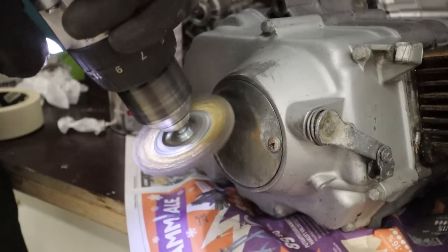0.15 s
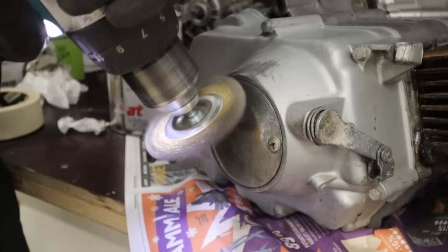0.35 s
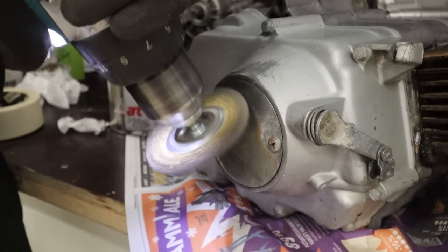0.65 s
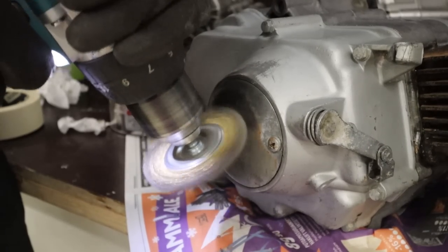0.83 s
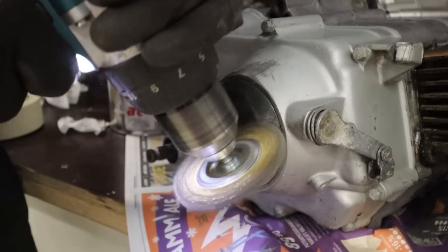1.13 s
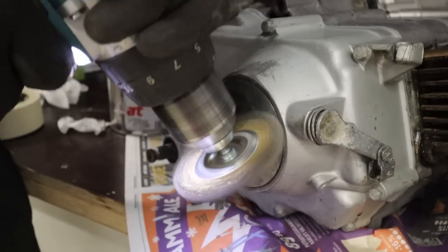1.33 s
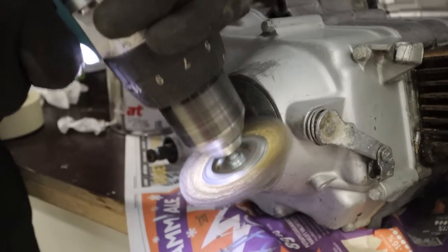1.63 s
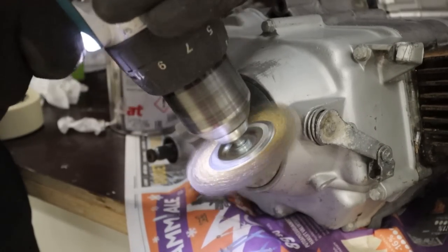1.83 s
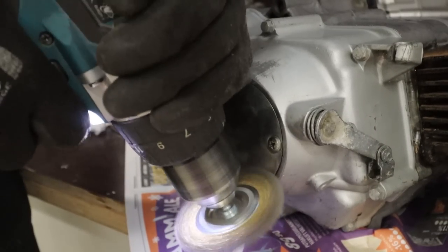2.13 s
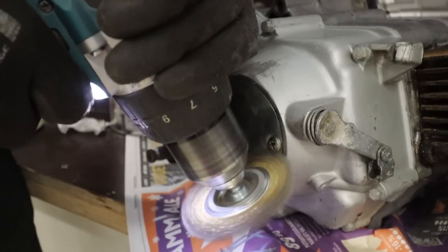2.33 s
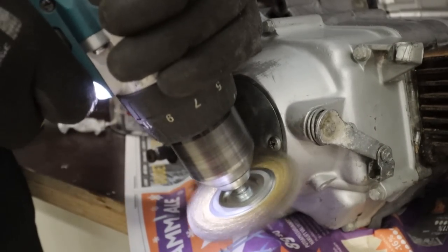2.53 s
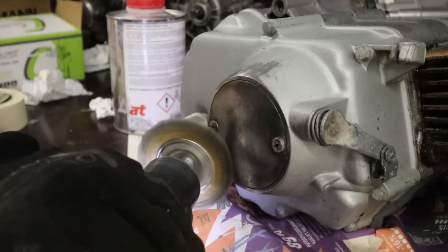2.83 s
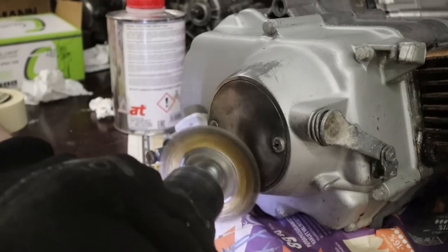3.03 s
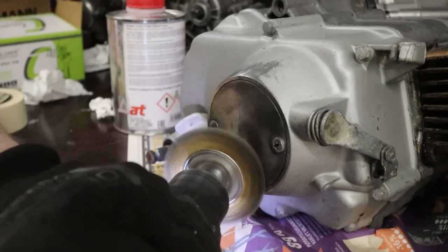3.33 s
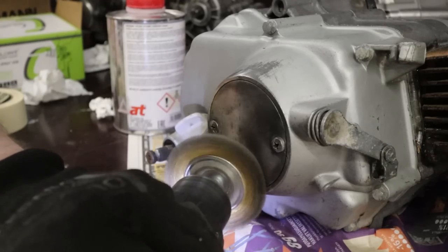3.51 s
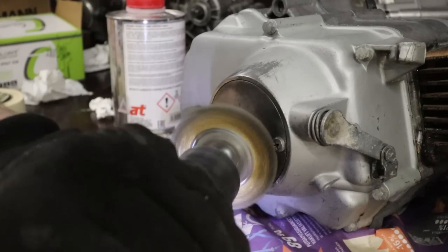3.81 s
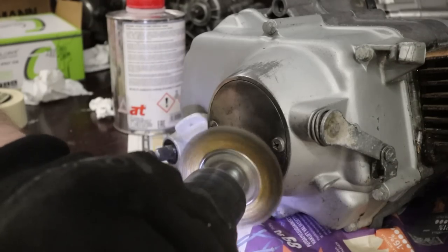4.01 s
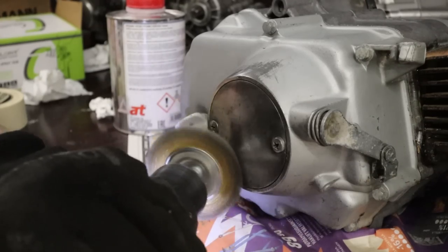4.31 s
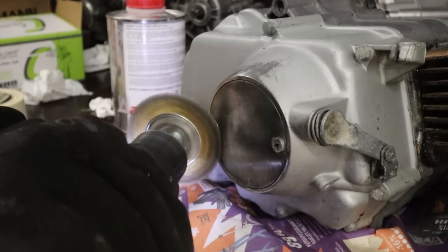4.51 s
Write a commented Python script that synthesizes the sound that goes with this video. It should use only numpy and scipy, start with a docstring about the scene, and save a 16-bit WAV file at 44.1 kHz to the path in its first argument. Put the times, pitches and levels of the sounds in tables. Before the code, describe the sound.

Close, dry workshop sound, the same in both channels: steady electric motor whine and rough metallic bristle hiss from the first instant to the last. Soft low gusts of air thump irregularly in the first half. Around the middle the drill blends into a second angle, more ringing and less windy. Later come rapid rasping chirps, faint dull knocks and a sharp wire click near the end.

```python
"""Drill with a wire brush on metal

A cordless drill spins a steel wire brush against a cast metal cover, close to a single microphone.
The motor whines in tones tied to its shaft speed; the bristles, made of shaped noise, scratch and ring the cover.
Short noise bursts make single wires snap, a long tuft scrape and the brush knock.
Midway one shot of the drill crossfades into a second, from another position: the colour shifts and
the cooling air buffets the microphone far less."""
import sys
import numpy as np
from scipy import signal
from scipy.fft import rfft, irfft
from scipy.io import wavfile
from scipy.ndimage import uniform_filter1d

SR = 44100
rng = np.random.default_rng(int(sys.argv[2]) if len(sys.argv) > 2 else 0)


def gain_from_decibels(decibels):
    """Convert decibel values to linear amplitude factors."""
    exponent = np.asarray(decibels, float) / 20
    return 10 ** exponent


def to_wav(s):
    """Save 16-bit WAV."""
    ch = np.atleast_2d(s).T  # columns
    pcm = np.round(np.clip(ch, -1, 1) * 32767)  # PCM
    wavfile.write(sys.argv[1], SR, pcm.astype(np.int16))


N = 205709  # length in samples
T = np.arange(N) / SR  # time of each sample, s
HZ = np.fft.rfftfreq(N, 1 / SR)  # pitch of each spectrum bin


def rms1(x):
    """Scale to unit rms."""
    return x / np.sqrt(np.mean(x ** 2))


def curves(table):
    """Draw straight lines through each column of a table, one value per sample."""
    time_s, *columns = np.transpose(table)
    return [np.interp(T, time_s, column) for column in columns]


def shape_db(points):
    """Read a (pitch_hz, level_db) list on a log-frequency axis, one level per spectrum bin."""
    hz, db = np.transpose(points)
    return np.interp(np.log(HZ + 1), np.log(hz), db)


def band(spectrum, lo_hz, hi_hz):
    """The part of a spectrum between two soft edges, as sound."""
    def below(edge_hz):
        return 1 / (1 + (HZ / edge_hz) ** 24)
    return irfft(spectrum * np.sqrt(below(hi_hz) * (1 - below(lo_hz))), N)


def walk(rate_hz):
    """Random levels renewed rate_hz times a second and smoothed twice, with an rms near 1."""
    hold = int(SR / rate_hz)
    steps = np.repeat(rng.standard_normal(N // hold + 1), hold)
    smooth = uniform_filter1d(uniform_filter1d(steps, hold), hold)
    return rms1(smooth[:N])


# motor speed, sagging under load: start_s, shaft_hz
SHAFT_SPEED = [(0, 407), (.15, 407.4), (.22, 401.5), (.46, 399.5), (.53, 395.1), (.63, 399.3), (.91, 400),
               (1.05, 397.1), (1.1, 401), (1.26, 401.3), (1.35, 395), (1.39, 399.7), (1.6, 397.7),
               (1.66, 398.8), (1.73, 395.4), (1.84, 395.8), (1.89, 399.1), (1.97, 394.6), (2.14, 401),
               (2.35, 401.4), (2.41, 398), (2.57, 399), (2.65, 394.7), (2.87, 399.8), (3.02, 395),
               (3.2, 400.4), (3.38, 398.3), (3.6, 398.3), (3.83, 391.7), (3.94, 400), (4.04, 402.5),
               (4.2, 395), (4.34, 400.5), (4.41, 400.8), (4.55, 393.7), (4.66, 396.5)]


def shaft():
    """Motor speed, and the turns it adds up to as snagging wires tug the speed a little at random."""
    shaft_hz = curves(SHAFT_SPEED)[0]
    turns = np.cumsum(shaft_hz * (1 + 0.0005 * walk(40))) / SR
    return turns, shaft_hz


def crossfade():
    """Share of the second shot: 0 in the first shot, 1 in the second, a straight ramp between."""
    return np.interp(T, (2.37, 3.05), (0, 1))


def tone(turns, order, db, rough, wobble_hz):
    """A sine at a multiple (order) of the shaft speed; roughness shakes its size and phase."""
    shake = 1 + rough * (walk(wobble_hz) + 1j * walk(wobble_hz))
    wave = np.real(shake * np.exp(2j * np.pi * order * turns))
    return np.sqrt(2) * gain_from_decibels(db) * wave / np.sqrt(1 + 2 * rough ** 2)


MAIN_ORDERS = (1, 20, 23)  # pitches as multiples of the shaft speed
# motor tones, one row per main order: first_shot_db, second_shot_db, roughness (0-1), slow_waver_db
MAIN_TONES = [(-38, -39.5, 0.13, 0.64), (-40, -42, .2, 2), (-31.5, -41, 0.3, 3)]
# commutator whine and its octaves, as the vents turn to and from the microphone:
# start_s, order_4_db, order_8_db, order_16_db
COMMUTATOR_WHINE = [(0, -28, -32, -30), (.25, -25.5, -32, -33), (.5, -27.5, -37, -31),
                    (1.1, -26.5, -38, -35), (1.6, -25, -33, -33), (2.3, -26.5, -46, -35),
                    (2.7, -27.5, -36, -39), (2.95, -35.5, -29, -30), (3.25, -31.5, -33, -31),
                    (3.5, -32.5, -32.5, -37), (3.75, -34, -33, -30), (4.0, -44, -30, -31),
                    (4.25, -41, -34, -30), (4.5, -37, -29, -29), (4.66, -44, -31, -34)]
# weaker gear and spindle tones, levels before the load changes them:
# order (multiple of shaft speed), first_shot_db, second_shot_db, roughness (0-1)
GEAR_TONES = [(.244, -57.5, -57, 0.44), (.57, -68, -58.5, 1), (5., -62, -41, 0.3), (6., -68, -52, 0.17),
              (10.19, -60, -36, 1)]


def motor(turns, shaft_hz, second_share):
    """Main, commutator and gear tones all follow the shaft; the gears growl louder as it sags."""
    main = 0
    for order, (first_db, second_db, rough, waver_db) in zip(MAIN_ORDERS, MAIN_TONES):
        level_db = first_db + second_share * (second_db - first_db) + waver_db * walk(4.06)
        main = main + tone(turns, order, level_db, rough, 60)
    whine = 0
    for order, level_db in zip((4, 8, 16), curves(COMMUTATOR_WHINE)):
        whine = whine + tone(turns, order, level_db, 0.12, 60)
    gears = 0
    for order, first_db, second_db, rough in GEAR_TONES:
        gears = gears + tone(turns, order, first_db + second_share * (second_db - first_db), rough, 30)
    usual_hz, load_db_per_hz = 398.3, 1.1
    load_db = np.clip(load_db_per_hz * (usual_hz - shaft_hz), -6, 4)
    # main tones and whine dip briefly where the two shots cross and partly cancel
    dip_s, dip_width_s, dip_db = 2.81, 0.03, -9
    dip = gain_from_decibels(dip_db * np.exp(-((T - dip_s) / dip_width_s) ** 2))
    return (main + whine) * dip + gears * gain_from_decibels(load_db)


# resonances and hollows of cover and bench: pitch_hz, width_hz, first_shot_db, second_shot_db
COVER_RESONANCES = [(830, 50, 7, 0), (940, 100, 0, 3), (1370, 120, -3, -3), (2080, 200, -2, 0),
                    (2400, 100, 2, 1), (3030, 120, -3, -2), (3120, 50, 6, 0), (3580, 80, 0, 2),
                    (3760, 160, 0, 4.5), (4070, 80, 0, 2), (5800, 400, 2, 1), (6650, 500, -4, -4),
                    (7130, 250, 0, 4), (8050, 300, 2, 0), (10700, 700, 0, -2), (11300, 400, 0, 2),
                    (14250, 350, 2, 2.5)]


def coloured(x, column, points):
    """Spectrum of x through one shot's colour and the cover's resonances."""
    db = shape_db(points)
    for row in COVER_RESONANCES:
        db = db + row[column] / (1 + (2 * (HZ - row[0]) / row[1]) ** 2)
    return rfft(x) * gain_from_decibels(db)


# colour of rush and scratch in the first shot; each band is levelled later: pitch_hz, relative_db
FIRST_COLOUR = [(100, -24), (200, -27), (350, -19), (700, -12), (1000, -8), (1700, -6), (2100, -8),
                (3200, -5), (5500, -3), (6300, -6), (9000, -6), (10200, -13), (13500, -14.5), (14700, -17),
                (15700, -18.5)]
# the same in the second shot: pitch_hz, relative_db
SECOND_COLOUR = [(100, -30), (200, -28), (350, -19), (700, -12), (1000, -7), (1700, -6), (2900, -6),
                 (3700, -2), (5200, -7), (6300, -8), (9000, -6), (10200, -15), (12000, -13.5),
                 (13800, -16.5), (14900, -20.5), (15700, -21)]
# how hard the wires bear on the cover; each layer follows it by its own share: start_s, pressure_db
WIRE_PRESSURE = [(0, -1), (.28, 0.5), (.6, 0.3), (1.26, 0.8), (1.6, 0.2), (1.85, 0.8), (2.24, -.8),
                 (2.6, 0.5), (3.05, -0.5), (3.22, 0.5), (3.5, -.2), (3.8, 2), (3.98, -0.8), (4.2, 1.4),
                 (4.34, -2), (4.48, 1), (4.66, -2)]


def brush(turns, second_share):
    """Dense wire ticks of uneven size over air rush; the ring and scratch throb with the spindle."""
    size_db = np.minimum(2.75 * rng.exponential(size=N), 11)
    ticks = rms1(rng.standard_normal(N) * gain_from_decibels(size_db))
    noise = 0.65 * ticks + 0.76 * rng.standard_normal(N)
    first = coloured(noise, 2, FIRST_COLOUR)
    second = coloured(noise, 3, SECOND_COLOUR)
    pressure_db = curves(WIRE_PRESSURE)[0]

    def part(lo_hz, hi_hz):
        fading_out = (1 - second_share) * rms1(band(first, lo_hz, hi_hz))
        return fading_out + second_share * rms1(band(second, lo_hz, hi_hz))

    def layer_db(first_db, second_db, db_per_pressure_db):
        return first_db + second_share * (second_db - first_db) + db_per_pressure_db * pressure_db

    tuft_pass_s = 3.874  # a moment when the long tuft meets the cover
    shaft_turns_per_spindle_turn = 12.36
    turns_from_pass = turns - np.interp(tuft_pass_s, T, turns)
    throb = np.cos(2 * np.pi * turns_from_pass / shaft_turns_per_spindle_turn)
    chatter = walk(39.9)  # quick uneven flicker shared by the layers from fan to top

    rush_db = layer_db(-28.5, -29, 0.32)
    low = part(133, 405) * gain_from_decibels(rush_db - 18.5) + part(414, 1465) * gain_from_decibels(rush_db)
    fan = part(1625, 2920) * gain_from_decibels(-25 + 0.5 * second_share + 0.32 * chatter)
    ring = part(3110, 4180) * gain_from_decibels(layer_db(-26.5, -23.3, 0.71) + 0.47 * chatter + 0.35 * throb)
    scratch = part(4450, 5940) * gain_from_decibels(layer_db(-23, -25.5, 0.99) + 0.47 * chatter + 0.32 * throb)
    edge = part(6260, 7470) * gain_from_decibels(layer_db(-28.5, -27.5, 0.1) + 0.46 * chatter + 0.5 * throb)
    bright_db = layer_db(-26.5, -29, 1.2) + 0.45 * chatter + 0.74 * second_share * throb
    bright = part(8100, 9800) * gain_from_decibels(bright_db)
    top = part(10170, 19600) * gain_from_decibels(layer_db(-27, -27.5, 0.3) + 0.42 * chatter + 0.5 * throb)
    return low + fan + ring + scratch + edge + bright + top


# colour of the air's rumble, before it is scaled to unit rms: pitch_hz, relative_db
AIR_COLOUR = [(15, -4), (30, 0), (60, -1), (100, -7), (150, -14), (200, -20)]
# gusts of cooling air on the microphone, added to a steady floor: peak_s, level_db
AIR_GUSTS = [(.2, -44), (.6, -46), (.74, -48), (1.06, -45), (1.32, -36), (1.45, -47), (1.6, -41),
             (1.8, -40), (1.93, -40), (2.06, -39), (2.25, -52), (2.5, -49), (2.68, -52), (2.8, -54),
             (3.87, -58)]


def buffet():
    """Cooling air flaps on the microphone: low noise swelling in uneven gusts."""
    noise = rng.standard_normal(N) * gain_from_decibels(2 * walk(16))
    low = band(rfft(noise) * gain_from_decibels(shape_db(AIR_COLOUR)), 16, 230)
    rise_s, fall_s = 0.068, 0.07
    swell = 0
    for peak_s, db in AIR_GUSTS:
        swell = swell + gain_from_decibels(db) * np.exp(np.minimum((T - peak_s) / rise_s, (peak_s - T) / fall_s))
    floor_db = np.interp(T, (2.75, 2.95), (-53, -70))  # calmer air as the second shot fades in
    return rms1(low) * (gain_from_decibels(floor_db) + swell)


def bursts(rows, rise_s, fall_s, width, boost_db):
    """Short noise bursts ringing around a pitch: rows of peak_s, level_db, pitch_hz."""
    out = np.zeros(N)
    t = np.arange(int(0.08 * SR)) / SR
    env = (1 - np.exp(-t / rise_s)) * np.exp(-t / fall_s)
    for peak_s, db, hz in rows:
        b, a = signal.iirpeak(hz, 1 / width, fs=SR)  # width is a fraction of the pitch
        once = signal.lfilter(b, a, rng.standard_normal(len(t)))
        grain = rms1(signal.lfilter(b, a, once))
        burst = gain_from_decibels(db + boost_db) * grain * env / env.max()
        i = int(peak_s * SR) - env.argmax()  # the envelope peaks at peak_s
        out[i:i + len(t)] += burst[:N - i]
    return out


# single wires snapping free: peak_s, level_db
WIRE_SNAPS = [(2.08, -17), (2.381, -17), (4.184, -18), (4.499, -10)]


def snaps():
    """A wire springing free gives a very short, broad click around 5600 Hz."""
    return bursts([(s, db, 5600) for s, db in WIRE_SNAPS], 0.0004, 0.0015, 0.9, 0)


# the strongest scrapes of the long tuft, levels before a 2.5 dB boost: peak_s, level_db, pitch_hz
TUFT_SCRAPES = [(2.09, -20, 8250), (2.345, -23, 9230), (2.38, -26, 8680), (2.585, -18.5, 8800),
                (2.613, -23, 8410), (2.646, -25, 8510), (3.623, -30, 8920), (3.657, -26, 8450),
                (3.686, -25, 8380), (3.718, -25, 8500), (3.748, -27, 9000), (3.781, -20, 8940),
                (3.809, -20, 9100), (3.841, -21, 9200), (3.874, -17, 8610), (3.904, -29, 8390),
                (4.09, -27, 9100), (4.12, -25, 8700), (4.148, -24, 9260), (4.184, -20, 9100),
                (4.464, -26, 7030), (4.499, -24, 7060), (4.529, -24, 7500)]


def tufts():
    """The long tuft scrapes the cover: narrow noise bursts, each at its own high pitch."""
    return bursts(TUFT_SCRAPES, 0.004, 0.006, 0.067, 2.5)


# knocks of the brush on the cover, levels before a 9 dB cut: peak_s, level_db
BRUSH_KNOCKS = [(3.741, -29), (3.818, -29)]


def knocks():
    """The brush knocks the cover: dull, broad bursts around 300 Hz."""
    return bursts([(s, db, 300) for s, db in BRUSH_KNOCKS], 0.00596, 0.027, 1.0, -9)


def scene():
    """Drill, brush and air, heard alike in both channels."""
    turns, shaft_hz = shaft()
    second_share = crossfade()
    machine = motor(turns, shaft_hz, second_share) + brush(turns, second_share)
    mono = machine + buffet() + snaps() + tufts() + knocks()
    return np.array([mono, mono])


def low_pass(x):
    """Removes everything above the highest recorded frequency."""
    return signal.sosfilt(signal.butter(12, 17050, fs=SR, output="sos"), x)


def record(dry):
    """The microphone rounds the tallest peaks and cuts the top."""
    rounded = 1.31 * np.tanh(dry / 1.296)
    cut = signal.ellip(12, 0.3, 70, 15750, fs=SR, output="sos")  # steep low-pass at 15750 Hz
    mix = signal.sosfilt(cut, rounded)
    return low_pass(mix)


dry = scene()
out = record(dry)
to_wav(out)
```